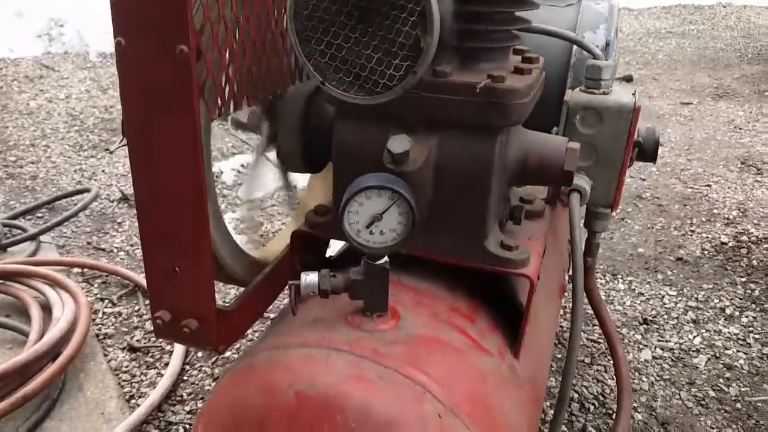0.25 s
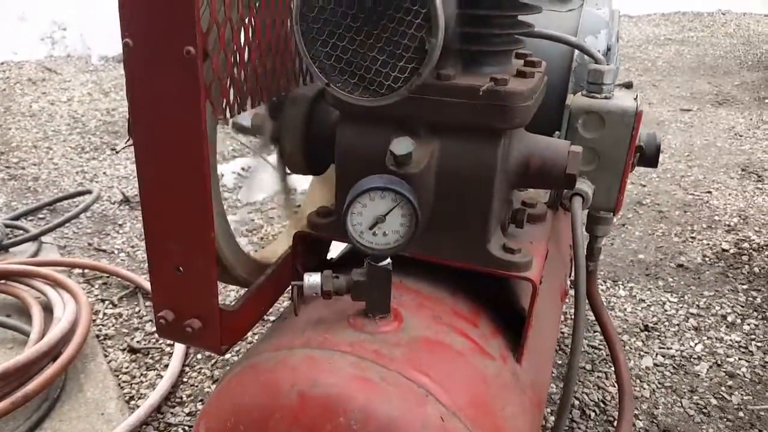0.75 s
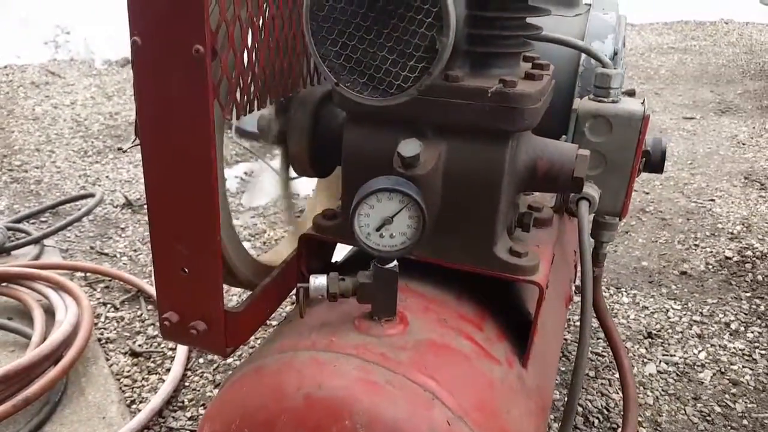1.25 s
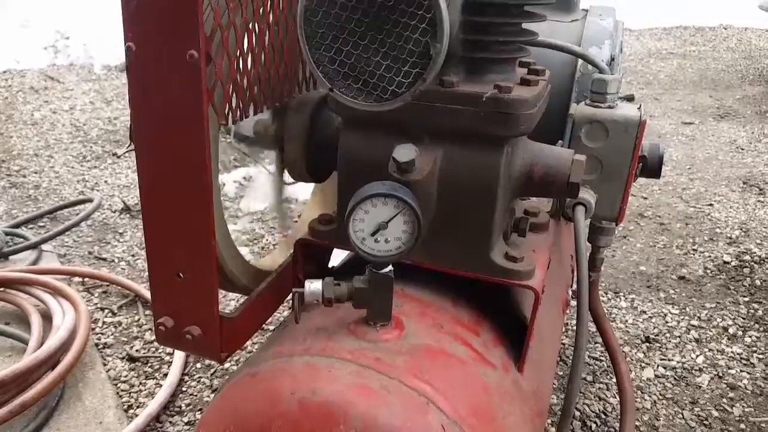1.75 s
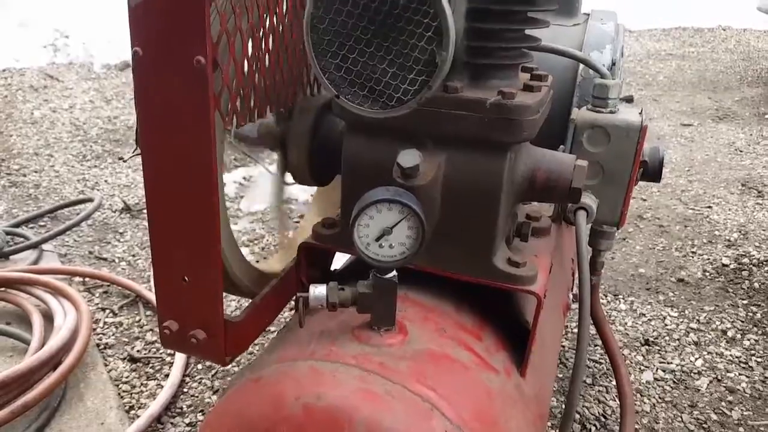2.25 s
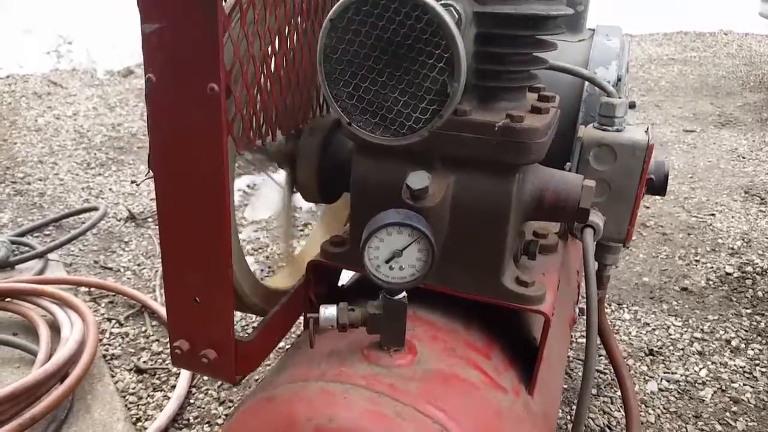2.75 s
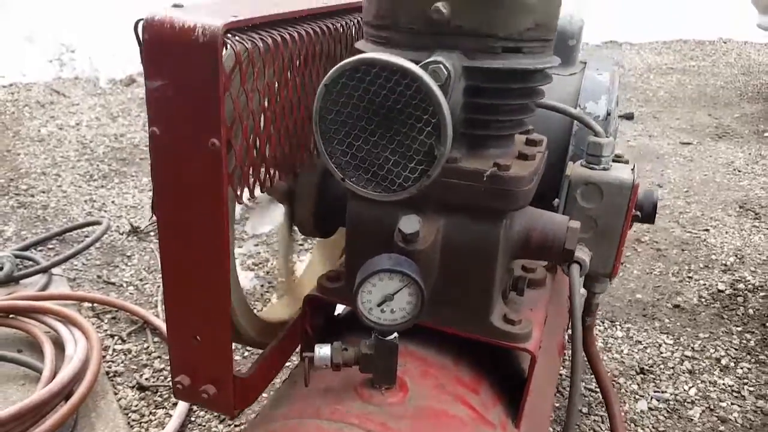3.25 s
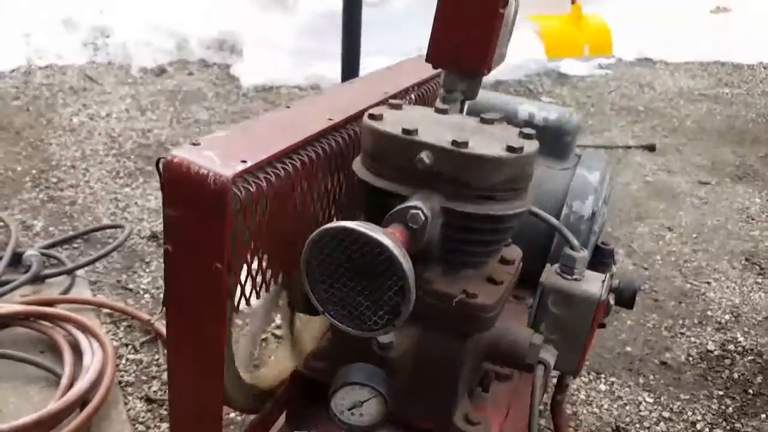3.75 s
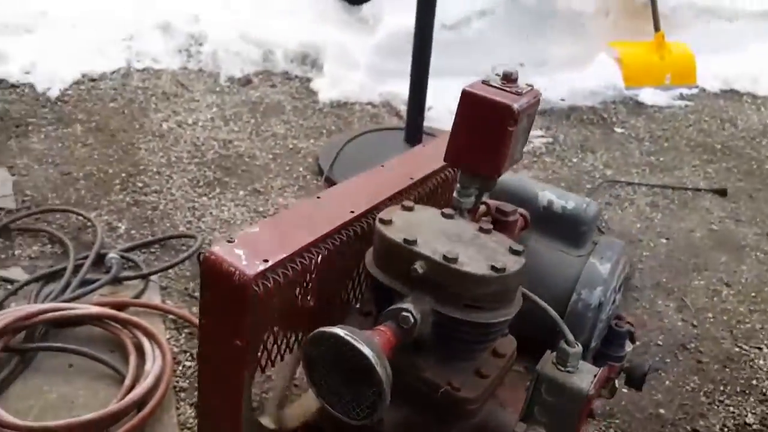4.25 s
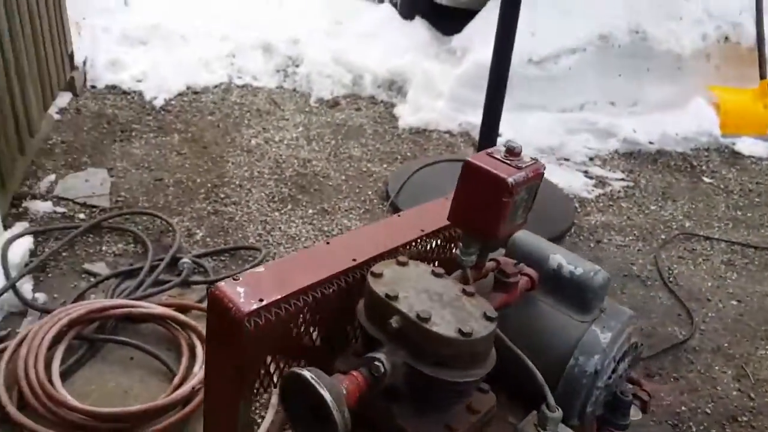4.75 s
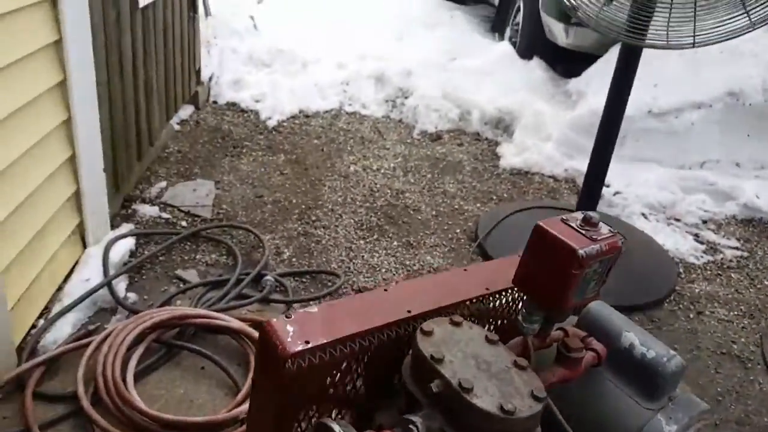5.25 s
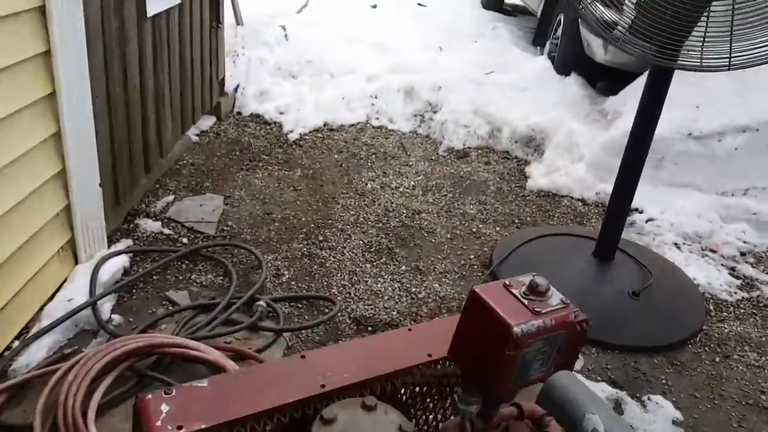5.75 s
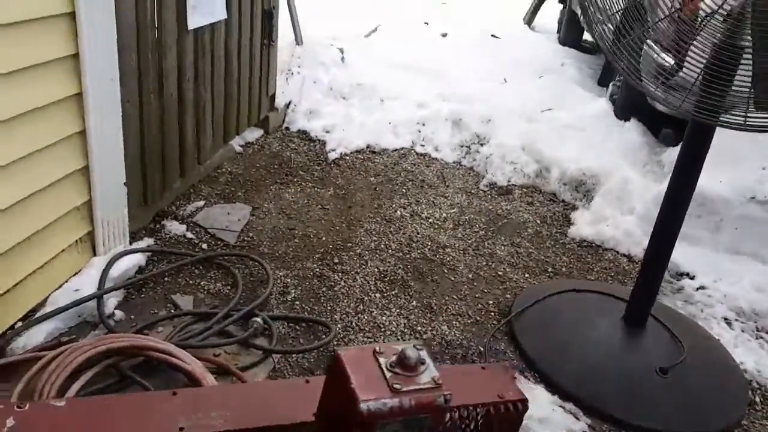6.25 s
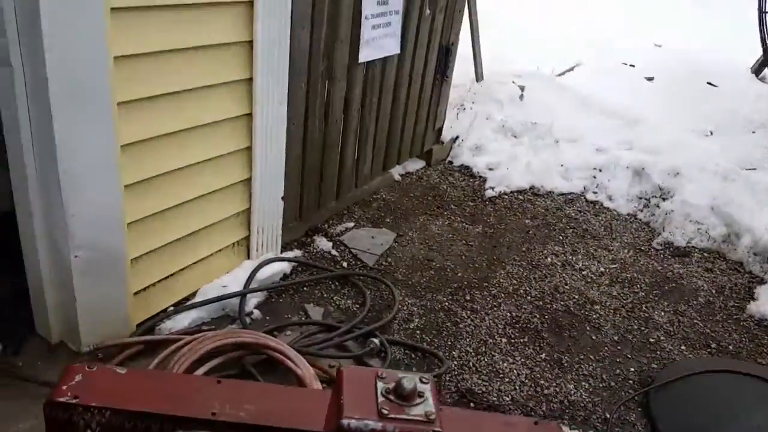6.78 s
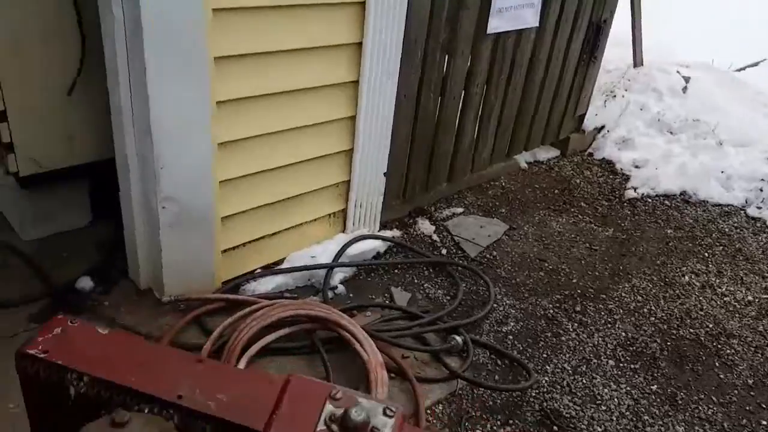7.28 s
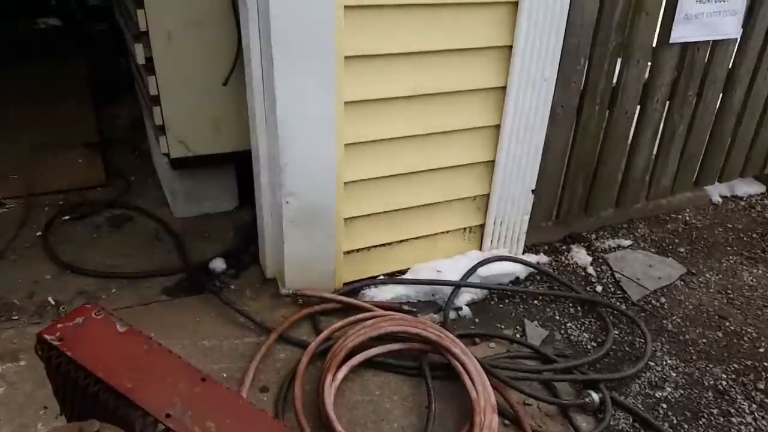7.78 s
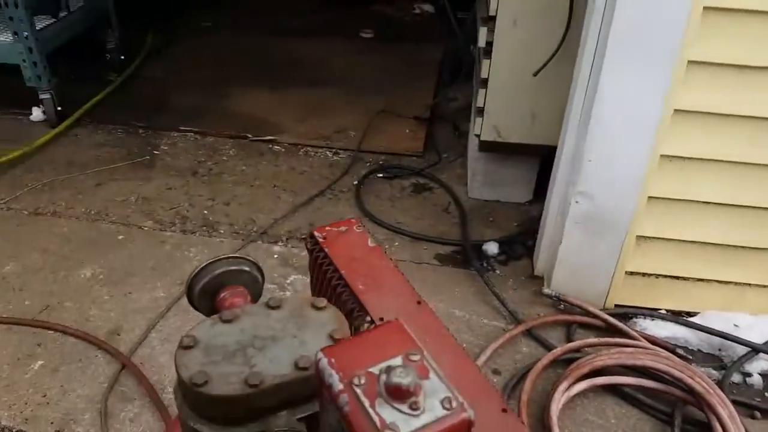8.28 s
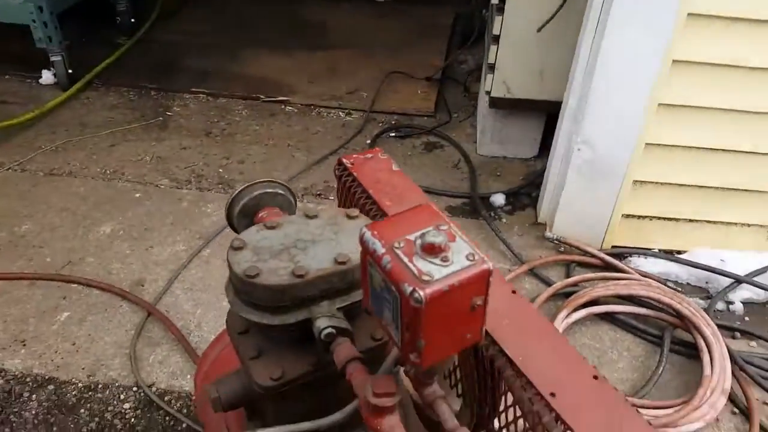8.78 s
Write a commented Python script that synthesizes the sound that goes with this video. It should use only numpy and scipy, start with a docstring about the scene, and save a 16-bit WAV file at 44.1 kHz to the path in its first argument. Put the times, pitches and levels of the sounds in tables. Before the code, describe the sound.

An air compressor runs without pause on gravel outdoors. About twenty-four intake strokes a second honk and buzz in a low, rough throb, over ringing tank and pump metal, a thin bearing whine and rattling hiss. A loose part ticks irregularly. The hand-held stereo microphone starts about a metre away and walks round, so the tone shifts; two faint dull bumps hit it mid-way and later.

```python
"""Honking intake strokes of a two-cylinder belt-driven air compressor outdoors; the listener walks slowly round it.
Each stroke sets a reed valve fluttering: harmonic partials honk and buzz through the filter.
The shaking drives resonances of the steel tank and cast pump head, and a worn ball bearing whines through them.
Shaped noise makes the air hiss and sheet-metal rattle; a loose part ticks as short decaying rings and cracks.
A dull ground echo follows, and two soft low bumps hit the hand-held microphone."""
import sys
import numpy as np
from scipy import signal
from scipy.fft import irfft
from scipy.io import wavfile
from scipy.ndimage import uniform_filter1d

SR = 44100
rng = np.random.default_rng(int(sys.argv[2]) if len(sys.argv) > 2 else 0)


def log_audio(samples):
    """Write samples as a 16-bit WAV file to the path given in sys.argv[1]."""
    # one column per channel
    frames = np.atleast_2d(samples).T
    # limit to full scale, then quantise
    limited = np.clip(frames, -1, 1)
    pcm = np.round(limited * 32767).astype(np.int16)
    wavfile.write(sys.argv[1], SR, pcm)


def natural_amplitude(level_db):
    """Convert a level in decibels to a linear amplitude factor, elementwise."""
    exponent = np.asarray(level_db, float) / 20
    return 10 ** exponent


N = 397782

CRANK_HZ, CRANK_ZERO_S = 11.96, 0.00217
# motor bearing: rate at which the ball set laps the outer and the inner ring
BALLS, OUTER_LAP_HZ, INNER_LAP_HZ = 7, 21.568, 37.365
# repeating shaking: repeat/Hz, strongest near f/Hz, relative level/dB, pulsing with each ball/0-1
REPEATS = [(CRANK_HZ, 820, -1.9, 0), (OUTER_LAP_HZ, 1880, -6, 0.62), (INNER_LAP_HZ, 3430, -9, 0.19)]

# cylinders: opens at/turn, open for/turn, flutter at rest f/Hz, first slap t/s, relative level/dB,
# extra on the overtones/dB
STROKES = [(0.326, 0.45, 184.3, 0.00398, 4, 2.6), (.834, 0.447, 194.6, 0.003366, 6, 0.6), ]
# lowest flutter partials: level/dB, swell rise exponent, swell fall exponent
OVERTONES = [(5, 0.52, 0.79), (8.5, 0.59, 1.1), (-2, 0.42, 1.55), (-8, 0.099, 6.9)]
# their phase lags: before the filter mouth/rad, behind it/rad
LAGS = [(0, 0), (2.1, .4), (3.45, 3.2), (3.5, 1.6)]
# upper buzz partials: level/dB
BUZZ_DB = [-11, -24, -8, -1, -3.5, -25, -3.5]
BUZZ_RISE, BUZZ_FALL, BUZZ_LAG_RAD = 0.82, 1.8, 1.2  # lag per partial
BUZZ_AXIS_DB, BUZZ_DB_PER_DEG = -29.5, -0.0462  # on the microphone axis, change off it
INTAKE_DB, INTAKE_PAN_DB_PER_DEG = -26, 0.08  # reference level at 1 m
# hum of motor and feet: f/Hz, level re intake reference/dB
HUM = [(59.6, -25), (119.2, -28)]
# filter mouth, one row a low partial: (all-round level/dB), beams (bearing/deg, width/deg, level/dB)
MOUTH_BEAMS = [((-0.7,), [(66.5, 39, 3.5), (136, 17, 4)]), ((0,), [(31, 10, -5.5), (86, 34, -3)]), ((0,),
               [(29.8, 9.1, 3.5), (87, 11, 4.5), (163, 10, -9)]), ((0,), [(30.6, 33, -7), (100, 15, 6)])]
MOUTH_EDGE_DEG = 22

# modes of steel tank and guard: f/Hz, width/Hz, relative level/dB
TANK_MODES = [(706, 5, -9), (741.5, 5, -6), (962, 3, -5), (1033, 6, -13), (1055, 6, -12), (1157, 8, -14),
              (1337, 6, -11), (1357, 6, -5), (1380, 6, -6), (1400, 5, 2), (1473, 9, -16), (1550, 10, -15),
              (1771, 10, -15), (1925, 8, -8), (2130, 14, -5), (2164, 4, 4), (2314, 14, -8), (2357, 14, -10),
              (2391, 10, -2), (2433, 18, -5), (2459, 10, 1), (2524, 12, -6), (2557, 12, -5), (2653, 12, -9),
              (2756, 9, -8)]
# modes of the cast pump head: f/Hz, width/Hz, relative level/dB
HEAD_MODES = [(3690, 30, -4), (3950, 50, -6), (4174, 25, -4), (5915, 45, -3), (6090, 70, -3), (6230, 60, 0),
              (6545, 90, -2), (7290, 55, -8), (7615, 100, -8), (8095, 45, -8), (12500, 120, -20.5)]
# borders between the mode groups: f/Hz
PART_EDGES_HZ = [850, 1000, 1250, 2050, 2230, 3200]
# mode groups (near tank end, far tank end, feet, low shell, guard, upper shell, head):
# all round (level/dB, left-right/dB), beams (bearing/deg, width/deg, level/dB, left-right/dB)
PART_BEAMS = [((-33.5, 0.54), [(96.5, 51, 6.5, 0.5), (170, 8.3, -5, -8)]), ((-31.5, 1), [(80, 72, -12, 2),
              (139, 42, 4.5, -8)]), ((-45, 3.7), [(58.6, 7.9, -25, -19), (129, 89, 10.5, 4.5)]),
              ((-29, 0.86), [(37.7, 30.4, 3, 6), (95.2, 13, 8, 5), (136, 5.1, 6, 9), (172, 13, 4, 8)]),
              ((-25.5, 36), [(18.1, 8.8, -5.5, 4), (55.5, 2, 12, 3), (115, 45, -24, -1),
              (176.3, 8.6, 22, 6)]), ((-25.5, 2.5), [(64.4, 18, 6.5, -1.5), (93.4, 6.7, 10, -8),
              (104.5, 4.8, 7.5, 1), (115.2, 8.7, 10.5, -11), (136.8, 3.3, 12, 0.5), (147, 4.6, 7.5, 13),
              (167, 16, 8.5, -3.5)]), ((-34.5, -0.79), [(33, 31, 3, 15), (73, 9.2, 4.5, -5),])]
# single modes beaming on top of their group: f/Hz, bearing/deg, width/deg, level/dB
MODE_BEAMS = [(741, 81, 79, -11.5), (1055, -23, 22, -17), (1157, 141.5, 3.5, 10), (1157, 26, 7.2, 12),
              (1360, 31, 14.7, 11), (1368, 75.5, 24, 13), (1475, 101, 21, 16.5)]
STEADY, LOOSE_DB = 1, -6.5  # evenness of the random shaking/0-1, its level in the drive mix

# hiss spectrum: f/Hz, relative level per Hz/dB
HISS = [(30, -8), (60, -58), (130, -5.5), (300, -5), (620, -7), (860, -11), (1500, -9), (2400, 3.5),
        (2900, -9), (4400, -19.5), (5350, -16.5), (6300, -11.5), (8600, -20), (9900, -45.5), (11000, -30.5),
        (15700, -40)]
# left-right likeness of the hiss: f/Hz, likeness/0-1
SAME = [(90, 0.15), (600, 0.89), (1500, 0.31), (2400, 0.49), (4000, 0.11), (8000, 0.038)]
# part of the hiss that repeats with the shafts: f/Hz, power share/0-1
RATTLE = [(300, 0.08), (700, 0.65), (2500, 0.36), (5000, 0.04)]
# hiss near 1.5, 2.4, 4, 13 kHz: all round (relative level/dB, left-right/dB),
# beams (bearing/deg, width/deg, level/dB, left-right/dB)
HISS_BEAMS = [((0, 4.2), [(70, 39, 0.24, -7), (136, 13, 7.1, -1.5)]), ((0, 3.3), [(116, 4.3, 0.89, -4)]),
              ((0, 2), [(70.6, 31, 4.4, -4.5), (153, 19, 6.4, 2)]), ((0, 1.8), [(76.6, 11, 4.9, 3),
              (117, 16, 5.6, 21)])]
PANEL_T60_S, PANEL_DRY = 0.4, 0.35  # dry power share

# loose-part ticks: t/s, ring level before random strength/dB, crack re ring before its gain/dB
TICKS = [(0.378, -25, -13), (0.885, -27, -31), (0.9722, -27, -20), (1.176, -29, -12), (1.3962, -29, -18),
         (1.6346, -23, -20), (1.8118, -27, -22), (2.0113, -28, -17), (2.303, -26, -22), (2.3925, -26, -35),
         (2.609, -31, -22), (2.845, -23, -20), (3.1457, -24, -19), (3.763, -22.5, -18), (4.2248, -25, -17),
         (4.682, -32, -9), (4.9814, -21, -29), (5.0614, -24, -35), (5.2669, -29, -12), (5.685, -25, -11),
         (6.646, -24, -14), (6.7351, -26, -22), (6.8245, -27, -19), (7.028, -28, -21), (7.2794, -38, -3),
         (7.439, -19, -15), (7.857, -20, -14), (8.4048, -25, -11), (8.5355, -26, -22), (8.7006, -17, -29),
         (8.789, -21, -30), (8.992, -23, -18)]
# ring of a tick: f/Hz, relative level/dB, t60/s
TICK_MODES = [(3975, 1, 0.055), (4140, -3, 0.025)]
FAINT_TICKS_PER_S, FAINT_TICK_MAX_DB = 14, -29  # before random strength

# dull bumps on the hand-held microphone: t/s, level/dB
BUMPS = [(4.66, -42), (6.181, -36)]
# walk: t/s, bearing round the machine/deg, distance to the filter/m, extra path of the ground echo/m,
# filter off the microphone axis/deg to the left, upper shell off it/deg to the left
WALK = [(0, 10, 0.97, 0.33, 15.3, -7), (3.1, 7.6, 1.035, 0.27, 17, -9), (3.6, 16, 1.1, 0.39, 17.5, -9),
        (4.0, 21.5, 1.18, 0.5, 18, -10), (4.35, 29.3, 1.27, 0.4, 17, -10.5),
        (4.9, 51, 1.42, 0.57, 19, -6.5), (5.3, 55, 1.27, 0.67, 26.7, -33),
        (5.8, 82.6, 1.18, 0.63, 23.6, -36), (6.15, 90, 1.35, 0.58, 24.5, -87),
        (6.6, 100.2, 1.6, 0.64, 26.7, -76), (7.05, 112.6, 1.57, 0.66, 28, -89),
        (7.4, 131, 1.7, 0.65, 29, -47), (7.75, 135, 2.36, 0.73, 46, -22.5),
        (8.25, 145, 1.58, 0.64, 23, -33), (8.6, 161.6, 1.5, 0.83, 24.7, -20),
        (9.02, 167, 1.94, 0.78, 16.4, -35.5)]
PORTS_M, SOUND_M_PER_S, GROUND_ECHO_DB = 0.15, 343, -18
MIC_LOW_HZ = 39


def evened(x):
    """Scales to rms 1."""
    return x / np.sqrt(np.mean(np.abs(x) ** 2))


def curves(rows, t):
    """Every column of a table at the times t."""
    s, *columns = np.transpose(rows)
    return np.array([np.interp(t, s, c) for c in columns])


def read(points, hz):
    """A spectrum at the frequencies hz, interpolated over log frequency."""
    f, value = np.transpose(points)
    return np.interp(np.log(hz + 1), np.log(f + 1), value)


def drift(shape, size):
    """Slow chance along the last axis, rms 1."""
    once = uniform_filter1d(rng.standard_normal(shape), size)
    return evened(uniform_filter1d(once, size))


def sides(pan_db):
    """Left and right gain at constant total power; positive leans left."""
    return np.sqrt(2 / (1 + natural_amplitude(np.array([-2 * pan_db, 2 * pan_db]))))


def right_late_s(off_axis_deg):
    """How much later a sound from the left reaches the right port."""
    return PORTS_M * np.sin(np.radians(off_axis_deg)) / SOUND_M_PER_S


def beamed(groups, t):
    """Level (and left-right balance, where given) in dB of each group at the bearing reached at t."""
    bearing = curves(WALK, t)[0]
    out = []
    for all_round, beams in groups:
        at, width, *strength = np.transpose(beams)
        lobes = np.exp(-((bearing - at[:, None]) / width[:, None]) ** 2)
        out.append(np.array(all_round)[:, None] + strength @ lobes)
    return np.swapaxes(out, 0, 1)


def behind_mouth(bearing):
    """How far the listener has gone round behind the filter mouth, 0-1."""
    return 1 / (1 + np.exp((MOUTH_EDGE_DEG - bearing) / 8))


def throb(depth_db, at_turn):
    """Gain that peaks twice a turn, once for each cylinder; rms 1."""
    turns = (np.arange(N) / SR - CRANK_ZERO_S) * CRANK_HZ
    return evened(natural_amplitude(depth_db * np.cos(2 * np.pi * 2 * (turns - at_turn))))


def repeating(repeat_hz, peak_hz, db, pulsing):
    """A fixed rough pattern played round and round: a comb of steady lines, swelling as each ball passes."""
    hz = np.arange(8193) * repeat_hz
    tilt = 2 / (1 + (hz / peak_hz) ** 2 / 2 + (peak_hz / (hz + 1)) ** 3 / 2)
    lines = np.exp(2j * np.pi * rng.random(8193)) * tilt
    laps = np.arange(N) / SR * repeat_hz
    pattern = np.interp(laps % 1 * 16384, np.arange(16384), irfft(lines * (hz < 9000)))
    white = 16384 * np.sqrt(repeat_hz / SR / 2)  # as strong per hertz as unit noise
    return natural_amplitude(db) * white * pattern * (1 + pulsing * np.cos(2 * np.pi * BALLS * laps))


def ground(x):
    """The gravel throws back a dull echo; its delay follows the extra path along the walk."""
    t = np.arange(N) / SR
    late_s = curves(WALK, t)[2] / SOUND_M_PER_S
    echo = np.array([np.interp(t - late_s, t, v) for v in uniform_filter1d(x, size=15)])
    return x + natural_amplitude(GROUND_ECHO_DB) * echo


def bumps(hz=62, t60_s=0.23, rise_s=0.0047):
    """A soft low swing of the microphone body: a decaying sine with a rounded onset."""
    t, at = np.arange(6000) / SR, np.zeros(N)
    for s, db in BUMPS:
        at[round(s * SR)] = natural_amplitude(db)
    swing = np.sin(2 * np.pi * hz * t) * natural_amplitude(-60 * t / t60_s) * (1 - np.exp(-t / rise_s)) * 2
    return signal.oaconvolve(at, swing)[:N]


def panels(x):
    """Countless faint modes of the sheet metal comb the noise finely; the comb changes round the machine."""
    t = np.arange(round(PANEL_T60_S * SR)) / SR
    rings = rng.standard_normal((2, len(t))) * natural_amplitude(-60 * t / PANEL_T60_S)
    turn = 2 * np.radians(curves(WALK, np.arange(N) / SR)[0])
    a, b = (signal.oaconvolve(x, r[None] / np.linalg.norm(r), axes=1)[:, :N] for r in rings)
    return np.sqrt(PANEL_DRY) * x + np.sqrt(1 - PANEL_DRY) * (np.cos(turn) * a + np.sin(turn) * b)


def hiss(patchy_db=2.0, level_db=-20.5):
    """Air noise in drifting patches over sheet-metal rattle; the top puffs as each cylinder discharges."""
    frames, hz = N // 128 + 5, np.fft.rfftfreq(512, 1 / SR)
    t = np.arange(frames) * 128 / SR
    a, b, c, d, patches = rng.standard_normal((frames, len(hz), 5)).T
    patches = uniform_filter1d(patches, size=5, axis=0)
    patches = evened(uniform_filter1d(patches, size=30, axis=1))
    air = np.array([a + 1j * b, c + 1j * d]) * natural_amplitude(patchy_db * patches)

    # direction: the lowest band follows the intake, the others have beams
    _, metres, _, off_axis, shell_off_axis = curves(WALK, t)
    rumble = np.array([-20 * np.log10(metres), INTAKE_PAN_DB_PER_DEG * off_axis])
    bands_hz = (150, 1500, 2400, 4000, 13000)
    blend = np.array([read(list(zip(bands_hz, row)), hz) for row in np.eye(5)])
    moves_db, pan_db = blend.T @ np.hstack([rumble[:, None], beamed(HISS_BEAMS, t)])

    rattles = [np.pad(sum(repeating(*row) for row in REPEATS), (0, 640)) for _ in range(2)]
    rattles = signal.stft(rattles, nperseg=512, noverlap=384)[2][..., :frames]
    rattle_power = np.mean(np.abs(rattles) ** 2, axis=2, keepdims=True)
    rattles = rattles / np.sqrt(rattle_power / 2 + 1e-30)  # flat spectrum, as strong as the air
    share = np.clip(read(RATTLE, hz), 0, 1)[:, None]
    left, other = np.sqrt(share) * rattles + np.sqrt(1 - share) * air

    same = np.clip(read(SAME, hz), -1, 1)[:, None]
    z = np.array([left, same * left + np.sqrt(1 - same ** 2) * other])
    z *= natural_amplitude(read(HISS, hz)[:, None] + moves_db) * sides(pan_db)
    off_axis = np.where(hz[:, None] < PART_EDGES_HZ[3], off_axis, shell_off_axis)
    z[1] *= np.exp(-2j * np.pi * hz[:, None] * right_late_s(off_axis))

    top = np.clip(hz / 12000, 0, 1)[:, None]
    low, high = (signal.istft(z * part, nperseg=512, noverlap=384)[1][:, :N] for part in (1 - top, top))
    return natural_amplitude(level_db) * evened(panels(low) * throb(1.0, 0.38) + high * throb(1.4, 0.21))


def ticks(strength_db=1.9, ring_rise_s=0.00086, crack_t60_s=0.033, crack_gain_db=8.5, pan_db=2.5):
    """A loose part knocks: a short ring of the casting and a thin crack; fainter ring-only knocks between."""
    t, ring_at, crack_at = np.arange(2600) / SR, np.zeros(N), np.zeros(N)
    for s, db, crack_db in TICKS:
        ring_at[round(s * SR)] = natural_amplitude(db)
        crack_at[round(s * SR)] = natural_amplitude(db + crack_db)
    ring_at += natural_amplitude(FAINT_TICK_MAX_DB) * rng.random(N) * (rng.random(N) < FAINT_TICKS_PER_S / SR)

    ring = np.zeros(N)
    for hz, db, t60_s in TICK_MODES:
        mode = natural_amplitude(db - 60 * t / t60_s) * np.sin(2 * np.pi * hz * t) * (1 - np.exp(-t / ring_rise_s)) ** 2
        struck = ring_at * natural_amplitude(strength_db * rng.standard_normal(N))  # each knock lands elsewhere
        ring += signal.oaconvolve(struck, mode)[:N]

    burst = signal.oaconvolve(crack_at, natural_amplitude(-60 * t / crack_t60_s))[:N] * rng.standard_normal((2, N))
    crack = signal.sosfilt(signal.butter(4, [10800, 15000], "band", fs=SR, output="sos"), burst)
    return sides(np.array([pan_db])) * (ring + natural_amplitude(crack_gain_db) * crack)


def ringing(wander_db=0.6, own_pan_db=1.4, own_radians=0.45):
    """One shaking drives every mode; each mode reaches the two ports with its own slow gain and phase."""
    f0, width, db = np.transpose(TANK_MODES + HEAD_MODES)
    random_shaking = rng.standard_normal(N) * throb(1.0, 0.2)
    shaking = np.array([random_shaking, sum(repeating(*row) for row in REPEATS)])
    hz, s, (loose, locked) = signal.stft(shaking, SR, nperseg=8192, noverlap=6144)
    steadied = loose * np.abs(evened(loose) + 1e-9) ** -STEADY  # never quite pauses
    z = steadied * natural_amplitude(LOOSE_DB) + locked
    # same mean power below 9 kHz as the random shaking has overall
    z = z * np.sqrt(np.mean(np.abs(loose) ** 2) / np.mean(np.abs(z[hz < 9000]) ** 2))

    off = (hz[:, None] - f0) / width
    shapes = natural_amplitude(db) / (1 + 2j * off) / (1 + (off / 5) ** 2)
    part = np.searchsorted(PART_EDGES_HZ, f0)
    power = np.bincount(part, (np.abs(shapes) ** 2).mean(0))

    level_db, pan_db = beamed(PART_BEAMS, s)[:, part]
    bearing = curves(WALK, s)[0]
    for at_hz, deg, wide, lobe_db in MODE_BEAMS:
        level_db[np.argmin(abs(f0 - at_hz))] += lobe_db * np.exp(-((bearing - deg) / wide) ** 2)
    # guard and upper shell share one direction
    off_axis = curves(WALK, s)[3:][np.isin(part, (4, 5)).astype(int)]
    lead = 2 * np.pi * f0[:, None] * right_late_s(off_axis)

    wander, own_pan, own_lead = drift((3, len(f0), len(s)), size=12)
    gain = natural_amplitude(level_db + wander_db * wander) / np.sqrt(power[part])[:, None]
    gain = gain * sides(pan_db + own_pan_db * own_pan)
    gain = gain * np.exp(0.5j * np.array([1, -1])[:, None, None] * (lead + own_radians * own_lead))
    return signal.istft((shapes @ gain) * z, nperseg=8192, noverlap=6144)[1][:, :N]


def intake(sag_hz=22, sag_s=0.0037, jitter_cycles=0.015, uneven_db=0.26, wall_db=-24.5, wall_s=0.011):
    """Each stroke starts a reed flutter that climbs to its rest pitch and dies as the valve shuts."""
    t = np.arange(N) / SR
    bearing, metres, _, off_axis, _ = curves(WALK, t)
    first_db = INTAKE_DB - 20 * np.log10(metres)
    buzz_db = BUZZ_AXIS_DB + BUZZ_DB_PER_DEG * off_axis
    lag = [front + (rear - front) * behind_mouth(bearing) for front, rear in LAGS]
    lag += [BUZZ_LAG_RAD * (len(LAGS) + k) for k in range(len(BUZZ_DB))]
    partials = OVERTONES + [(db, BUZZ_RISE, BUZZ_FALL) for db in BUZZ_DB]
    level_db = list(first_db + beamed(MOUTH_BEAMS, t)[0]) + len(BUZZ_DB) * [buzz_db]

    tones = np.zeros((len(partials), N))
    for opens, lasts, hz, first_slap_s, db, over_db in STROKES:
        turns = (t - CRANK_ZERO_S) * CRANK_HZ - opens + 1
        per_stroke = rng.standard_normal((int(turns[-1]) + 1, 2))
        phase_chance, level_chance = per_stroke[turns.astype(int)].T
        age = turns % 1 / CRANK_HZ - first_slap_s
        cycles = hz * age + sag_hz * sag_s * (np.exp(-age / sag_s) - 1) + jitter_cycles * phase_chance
        u = np.clip(turns % 1 / lasts, 0, 1)
        for k, (_, rise, fall) in enumerate(partials):
            swell = u ** abs(rise) * (1 - u) ** abs(fall)
            swell = swell * natural_amplitude(db + over_db * (k > 0) + uneven_db * level_chance)
            tones[k] += swell * np.cos(2 * np.pi * (k + 1) * cycles + lag[k])

    honk = np.zeros(N)
    for tone, level, (db, _, _) in zip(tones, level_db, partials):
        honk += natural_amplitude(db + level) * evened(tone)
    # echo off the nearby wall fills the gaps between strokes
    honk += natural_amplitude(wall_db) * np.interp(t - wall_s, t, honk)
    for hz, db in HUM:
        honk += natural_amplitude(first_db + db) * np.sqrt(2) * np.sin(2 * np.pi * hz * t)
    right = np.interp(t - right_late_s(off_axis), t, honk)
    return sides(INTAKE_PAN_DB_PER_DEG * off_axis) * np.array([honk, right])


def scene():
    """Intake, ringing and hiss with their ground echo, plus ticks and bumps without it."""
    return ground(intake() + ringing() + hiss()) + ticks() + bumps()


def top_cut(x):
    """Nothing passes above the cut-off."""
    return signal.sosfilt(signal.butter(12, 15880, fs=SR, output="sos"), x)


def record(dry):
    """The microphone loses the deepest bass."""
    low_cut = signal.butter(2, MIC_LOW_HZ, "high", fs=SR, output="sos")
    heard = signal.sosfilt(low_cut, dry)
    return top_cut(heard)


dry = scene()
out = record(dry)
log_audio(out)
```